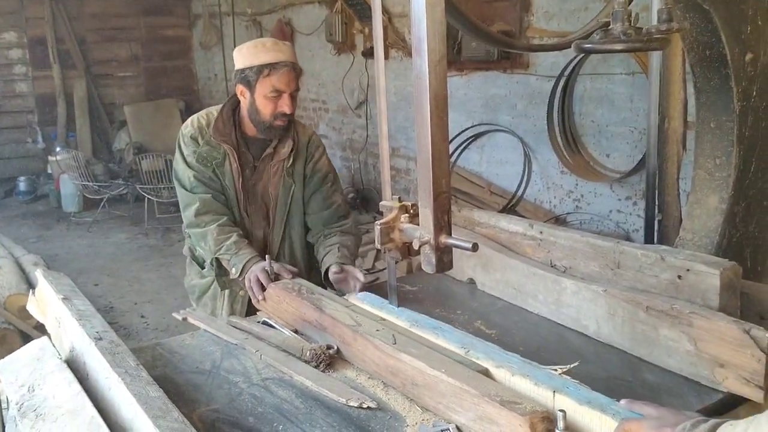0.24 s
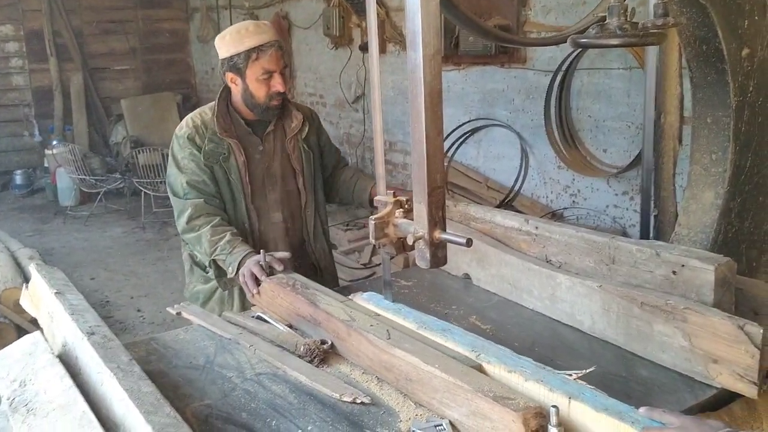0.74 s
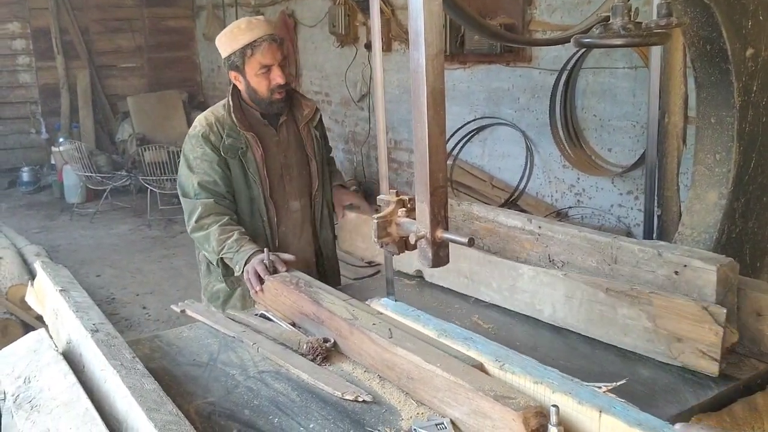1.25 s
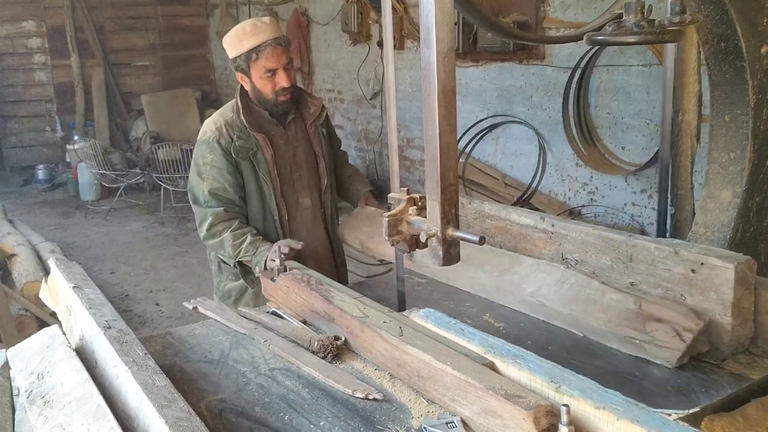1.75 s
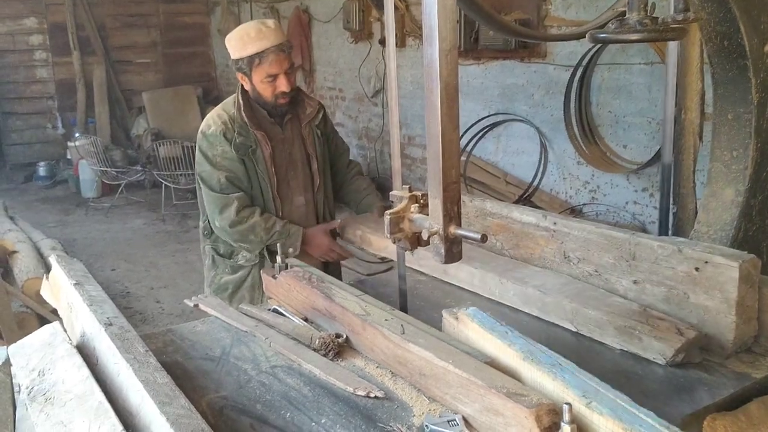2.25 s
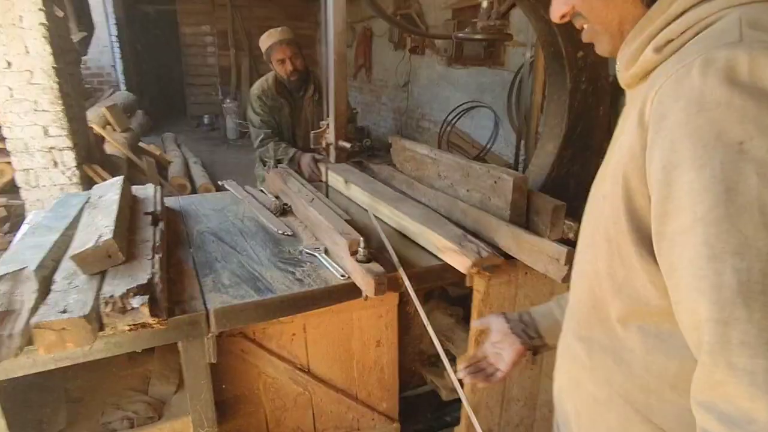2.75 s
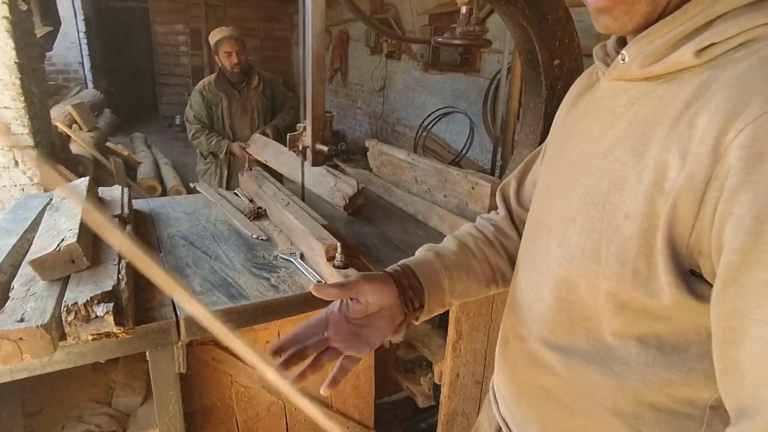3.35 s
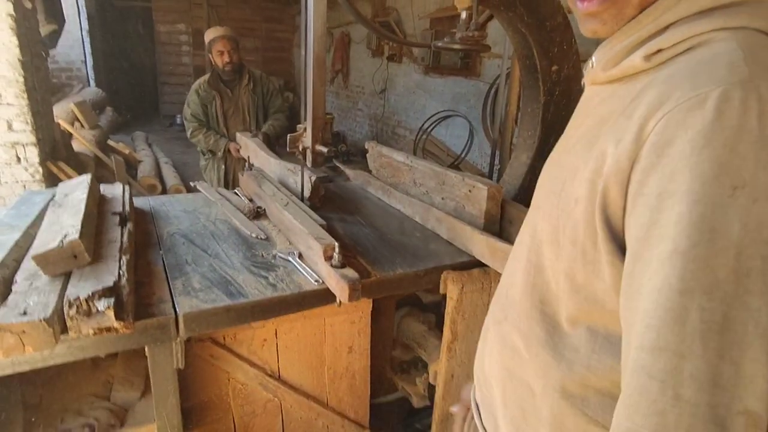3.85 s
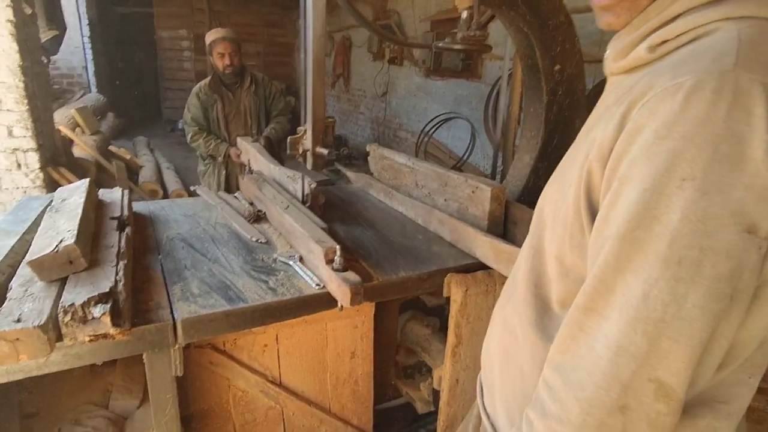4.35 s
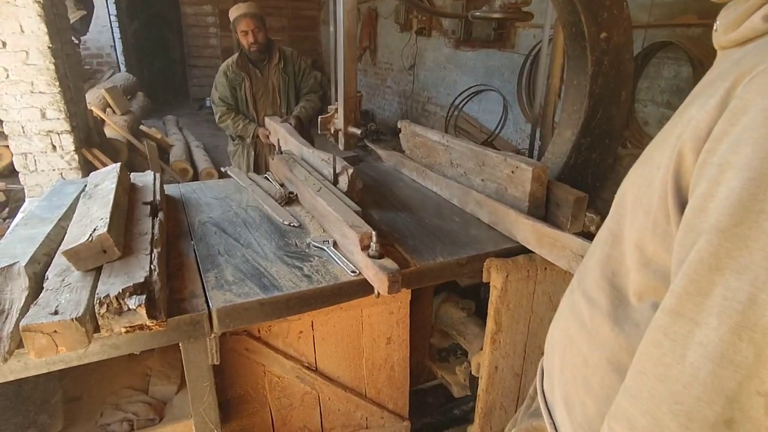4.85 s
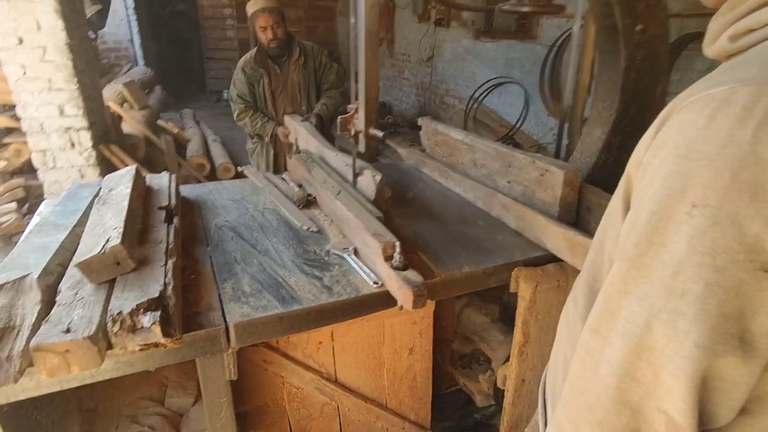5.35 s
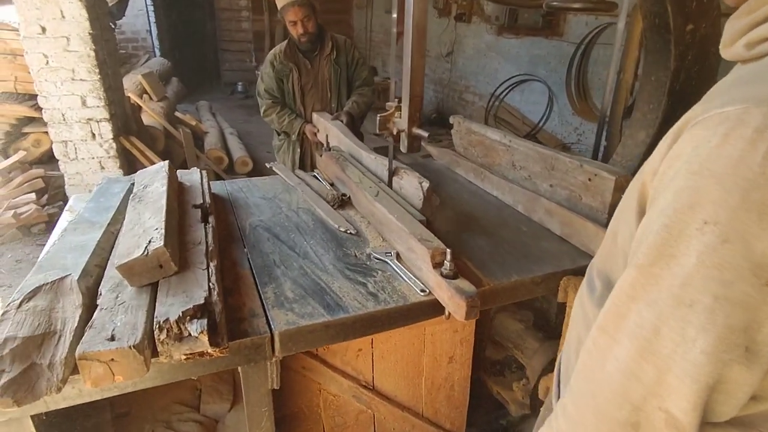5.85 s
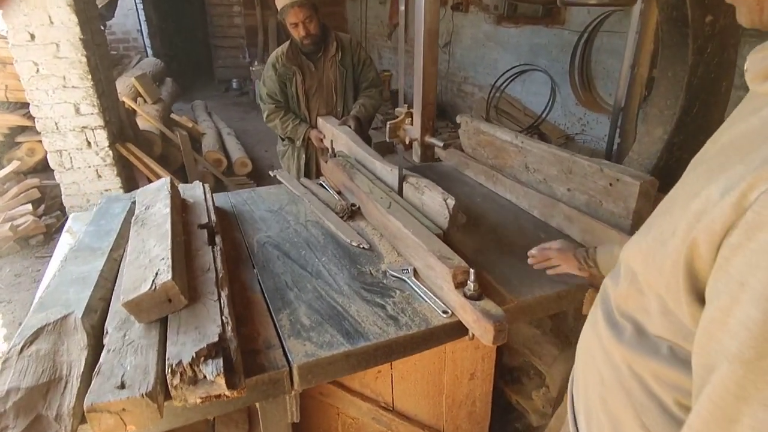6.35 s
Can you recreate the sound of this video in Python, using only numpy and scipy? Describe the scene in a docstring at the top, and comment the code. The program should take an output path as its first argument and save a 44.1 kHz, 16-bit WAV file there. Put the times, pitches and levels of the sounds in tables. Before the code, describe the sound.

A large band saw rasps and whines through a timber beam in a workshop, with planks knocking, a brief silent break, then a more distant, ringing view.

```python
"""A big band saw rips a beam in a workshop, heard from two places with a short pause between.
Noise shaped into rasp, ring and hiss makes the teeth, the steel band and the dust; sine waves make the whine.
Filtered noise makes the rumble of the wheels and drive, and now and then a faint singing of the band.
Short bursts of noise make planks knock on the saw table; a deep thump makes the gain control
turn the treble down for a moment."""
import sys
import numpy as np
from scipy import signal
from scipy.fft import rfft, irfft
from scipy.io import wavfile
from scipy.ndimage import uniform_filter1d, minimum_filter1d

SR = 44100
rng = np.random.default_rng(int(sys.argv[2]) if len(sys.argv) > 2 else 0)


def pcm_store(signal):
    """Save signal as 16-bit PCM."""
    levels = np.round(np.clip(np.atleast_2d(signal), -1, 1) * 32767)
    wavfile.write(sys.argv[1], SR, levels.astype(np.int16).T)


N = 291060

# "near" is the place by the blade, heard first; "far" is further off, heard after the pause
# side_db means left minus right; the levels in a spectrum only count against each other

# spectrum of the wheels and drive: pitch_hz, level_db (per Hz)
DRIVE_SPECTRUM = [(25, -3), (70, -11.5), (120, -3), (160, 1.5), (260, -1), (340, -1.5), (450, -5.5),
                  (600, -3), (1000, -8), (1500, -11), (2200, -9.5), (3300, -14.5), (6000, -35.5)]
# spectrum of the teeth tearing wood, near and far: pitch_hz, level_db (per Hz)
RASP_NEAR_SPECTRUM = [(300, -34.5), (900, -14), (1600, -13.5), (2000, -3), (2850, 1), (3400, -1.5),
                      (4300, -13), (5200, -14), (6200, -27), (9000, -51)]
RASP_FAR_SPECTRUM = [(300, -37), (900, -3), (1550, -2), (1800, 2), (2100, 4), (2500, 1.5), (3400, 4),
                     (4500, -1), (6500, -4.5), (9000, -8)]
# spectrum of the ringing steel band: pitch_hz, level_db (per Hz)
RING_SPECTRUM = [(3000, -46.5), (3650, -19), (3800, -9), (3920, -0.5), (4250, -4), (4900, -7), (5400, -13),
                 (5900, -21), (6500, -38), (8000, -68)]
# spectrum of the sawdust spray: pitch_hz, left_level_db (per Hz), right_level_db (per Hz)
HISS_SPECTRUM = [(5500, -44, -37), (6700, -23, -15.5), (7430, -11, -10), (10480, -5, -4.5),
                 (10260, 1.5, 5.5), (11170, 1, -4), (12600, -1.5, -4), (14300, 1.5, -7.5)]
# how the drive spreads in stereo: pitch_hz, near_side_db, far_side_db, left_right_likeness (0 to 1)
DRIVE_SIDES = [(40, 15, 5.8, 0.4), (150, 12.5, 7.4, 0.92), (300, 9, 4.2, 0.7), (600, 8, 1.8, 0.2),
               (1110, 1, 2.2, 0), (2200, -7, 3, 0)]
# resonances of the frame, table and shed: pitch_hz, width_hz, near_lift_db, far_lift_db
FRAME_RESONANCES = [(157, 22, 2, 6.5), (185, 30, -1, -0.5), (232, 18, 7.5, 10.5), (274, 18, 6, 6.5),
                    (392, 26, 1.5, 0), (501, 42, 0, 8.5), (573, 32, 5, 5.5), (682, 38, 2.5, 4),
                    (760, 6.9, 11.5, 12.5), (933, 17, 4, 3), (1115, 207, 12, 12.5), (1168, 52, -5, -12),
                    (1353, 59, 13, 10.5), (1581, 50, 11.5, -20), (1722, 86, 12.5, 11.5)]
# whine of teeth set left and right in turn: multiple of the pair rate, near_level_db, far_level_db, side_db
TOOTH_LINES = [(4, -52, -58.5, -22), (5, -58, -57, -7), (8, -39.5, -62, -8), (10, -35, -64, -25),
               (12, -68, -67, -28), (16, -39, -60, -3.5)]
# moments when the band sings in its guides: start_s, end_s, pitch_hz, level_db
SINGING_MOMENTS = [(3.25, 3.53, 1120, -40.5), (3.2, 3.7, 1357, -43), (3.4, 3.65, 1745, -46),
                   (4.7, 5.25, 1748, -44), (5.5, 6.0, 1745, -46)]
# planks on the table: start_s, level_db, lowest_hz, highest_hz, chatter_s, side_db
PLANK_KNOCKS = [(1.337, -21.5, 130, 970, 0.029, 10), (1.375, -27.5, 190, 450, 0.04, 10),
                (1.915, -26, 200, 1050, 0.021, 14), (1.925, -28, 120, 900, 0.033, 9),
                (3.642, -26.5, 150, 650, 0.048, 3), (4.067, -20, 457, 960, 0.034, 3.5),
                (4.102, -19, 400, 1800, 0.027, 15), (4.111, -20, 900, 1700, 0.012, -7),
                (4.563, -29.5, 340, 700, 0.046, 5), (5.145, -23, 30, 109, 0.017, 27),
                (5.157, -19.5, 60, 615, 0.021, 14), (5.167, -21.5, 250, 1380, 0.0089, 16),
                (5.182, -20.5, 80, 553, 0.004, 16), (5.198, -21.5, 100, 404, 0.017, 21),
                (5.217, -22.5, 70, 935, 0.024, 19), (5.241, -25, 70, 735, 0.016, 17),
                (5.287, -21.5, 50, 470, 0.013, 16.5)]
# resonances of a plank: pitch_hz, width_hz, lift_db
PLANK_RESONANCES = [(197, 55, 10.5), (291, 110, 12.5), (485, 45, 4.5), (618, 74, 8.5), (765, 93, 8.5),
                    (1068, 160, 8.5), (1640, 110, 6)]
# work of the saw, which bites hardest just before the band comes free and rings:
# time_s, rasp_level_db, ring_level_db, hiss_level_db
SAW_WORK = [(0, -27.5, -32, -29), (1.2, -28, -31, -31), (1.35, -23.5, -32, -31.5),
            (1.73, -24, -29.5, -32.5), (1.76, -29, -33.5, -37.5), (1.92, -28.5, -24, -33),
            (2.66, -29.5, -24, -31), (3.0, -37, -21.5, -27), (3.2, -37, -23.5, -34),
            (3.6, -36, -24.5, -29.5), (4.0, -34, -24, -29.5), (4.3, -35, -24, -34),
            (4.9, -36.5, -25, -28.5), (5.6, -35.5, -24.5, -29.5), (6.15, -39, -25, -31.5),
            (6.6, -36, -24.5, -31.5)]
# moments when the pressure on the band eases: middle_s, length_s, depth_db
PRESSURE_DIPS = [(0.177, 0.16, -4.5), (0.504, 0.13, -2.0), (0.621, 0.19, -4.5), (1.434, 0.19, -3),
                 (2.276, 0.14, -2.5), (2.5, 0.068, -1.5), (3.123, 0.15, -2.5), (3.356, 0.1, -3),
                 (3.758, 0.06, -3), (4.19, 0.12, -3.5), (5.366, 0.24, -2.5), (6.247, 0.075, -2.5)]
# the band presses harder twice in each turn of its wheels, one row near and one far:
# turns_per_s, crest_s, once_a_turn_db, twice_a_turn_db
WHEEL_WOBBLE = [(4.585, -.04, .45, .55), (4.405, .02, .45, .25)]
# how the treble reaches the microphones: time_s, hiss_side_db, ring_tilt_db (per octave)
TREBLE_PATH = [(0, -3, -31), (1.1, -3.5, -22.5), (1.9, -8.5, -22), (2.7, -10.5, -24), (2.8, -19, 4),
               (3.9, -14.5, 4), (5.0, -11.5, 1.5), (6.6, -2, 16)]
# gain control, one row for the left microphone and one for the right: depth_db, recovery_db_per_s
DUCK_SIDES = [(19, 90), (10.5, 900)]
# the running machine: time_s, rumble_level_db, whine_level_db (added to the level of each tooth line)
MACHINE_RUN = [(0, -33.5, -4.5), (1.5, -37, -0.5), (2.0, -36, -12), (2.65, -34.5, -3.5), (2.95, -39, 5),
               (3.4, -36, 5.5), (4.5, -32.5, 11.5), (5.2, -36, -8), (5.6, -35.5, 10.5), (6.6, -32.5, -11)]

PAUSE_START_S, TICK_S, PAUSE_END_S = 2.674, 2.769, 2.811
FADE_IN_DB, FADE_IN_S = -11.5, 0.18  # after the pause the sound swells to its full level
TOOTH_PAIR_HZ = 271.8
FLUTTER_DB, FLUTTER_PER_S = 0.96, 17.6  # uneven grain of the wood
DUCK_THRESHOLD_DB, DUCK_KNEE_DB = -36.5, 3
DUCK_LAG_S, DUCK_HOLD_S = .024, .03
EDGE_HZ = 14290  # the highest pitch let through
T, HZ = np.arange(N) / SR, np.fft.rfftfreq(N, 1 / SR)
NEAR = T < PAUSE_END_S


def amp(db):
    """Turns decibels into a gain."""
    return 10 ** (np.asarray(db) / 20)


def evened(x):
    """Scales to an rms (average strength) of one."""
    return x / np.sqrt(np.mean(x ** 2, axis=-1, keepdims=True) + 1e-20)


def curves(rows):
    """Draws each column of a timed table as a line through time, sample by sample."""
    times, *columns = np.transpose(rows)
    return [np.interp(T, times, column) for column in columns]


def spectrum(rows, axis=1):
    """Draws one column of a table over log frequency."""
    table = np.transpose(rows)
    return np.interp(np.log(HZ + 1), np.log(table[0] + 1), table[axis])


def bump(f, centre_hz, width_hz):
    """The shape of one resonance, one at its top."""
    return 1 / (1 + (2 * (f - centre_hz) / width_hz) ** 2)


def wander(rate, size=N):
    """Smooth random movement of rms one, changing up to about rate times in every SR points."""
    f = np.fft.rfftfreq(size, 1 / SR)
    smooth = rfft(rng.standard_normal(size)) / (1 + (f / rate) ** 4)
    return evened(irfft(smooth, size))


def ripple(depth_db, spacing_hz):
    """Close random peaks and dips from many modes and reflections, different at each microphone."""
    rate = SR * HZ[1] / spacing_hz / 2
    return depth_db * np.array([wander(rate, len(HZ)) for _ in range(2)])


def coloured(x, db, band=(0, SR)):
    """Filters two channels so that their average has rms one inside the band (in Hz)."""
    z = rfft(x) * amp(db)
    inside = (HZ >= band[0]) & (HZ <= band[1])
    return irfft(z, N) / np.std(irfft(z.mean(0) * inside, N))


def panned(side_db):
    """Left and right gains that keep the total power the same."""
    gains = amp(np.array([[.5], [-.5]]) * side_db)
    return gains / np.sqrt(np.mean(gains ** 2, axis=0))


def smoothed(x, size):
    """A running average (one-pole) over about size samples."""
    return signal.lfilter([1 / size], [1, 1 / size - 1], x)


def chips(per_s, share):
    """Fibres tearing: a dense rush of noise, with separate snaps of uneven size as a share of its power."""
    snaps = rng.standard_normal((2, N)) * (rng.random(N) < per_s / SR)
    rush = rng.standard_normal((2, N))
    return np.sqrt(1 - share) * rush + np.sqrt(share) * evened(snaps)


def drive(level_db):
    """Wheels, belt and bearings shake the frame; the microphones share more of the low end than the top."""
    left, other = rng.standard_normal((2, N))
    same = np.clip(spectrum(DRIVE_SIDES, axis=3), 0, 1)
    right = irfft(same * rfft(left) + np.sqrt(1 - same ** 2) * rfft(other), N)
    shake = np.array([left, right])
    places = []
    for place in range(2):
        frame_db = sum(lifts[place] * bump(HZ, hz, width) for hz, width, *lifts in FRAME_RESONANCES)
        side_db = 20 * np.log10(panned(spectrum(DRIVE_SIDES, axis=place + 1)))
        places.append(coloured(shake, spectrum(DRIVE_SPECTRUM) + frame_db + side_db))
    return amp(level_db + 0.78 * wander(rate=5.4)) * np.where(NEAR, *places)


def knocks(room_db=-17, room_t60_s=.4, strike=.3):
    """Each blow chatters briefly and rings the plank; the shed adds a short tail."""
    size = SR // 2
    t, f = np.arange(size) / SR, np.fft.rfftfreq(size, 1 / SR)
    plank = amp(sum(db * bump(f, hz, width) for hz, width, db in PLANK_RESONANCES))
    out = np.zeros((2, N + size))
    for start_s, level_db, low_hz, high_hz, chatter_s, side_db in PLANK_KNOCKS:
        contact = rng.standard_normal(size) * np.exp(-t / chatter_s)
        contact[0] += strike * np.sqrt(chatter_s * SR / 2)  # the first firm contact
        tail = rng.standard_normal((2, size)) * amp(room_db - 60 * t / room_t60_s)
        # the contact time limits the top, the size of the piece the bottom
        top = signal.butter(3, high_hz, fs=SR, output="sos")
        bottom = signal.butter(2, low_hz, "high", fs=SR, output="sos")
        limited = signal.sosfilt(np.vstack([top, bottom]), contact + tail)
        blow = irfft(rfft(limited) * plank, size) * (1 - t / t[-1])
        blow = blow / np.std(blow.mean(0)[:SR // 50])  # level set by the first 20 ms
        start = round(start_s * SR)
        out[:, start:start + size] += amp(level_db) * panned(side_db) * blow
    return out[:, :N]


def singing(width_hz=24):
    """Now and then one mode of the band sings faintly and unevenly where it rubs in the guides."""
    sway = wander(width_hz / 2) + 1j * wander(width_hz / 2)
    out = np.zeros(N)
    for start_s, end_s, pitch_hz, level_db in SINGING_MOMENTS:
        swell = np.sin(np.pi * np.clip((T - start_s) / (end_s - start_s), 0, 1))
        out += amp(level_db) * swell * (sway * np.exp(2j * np.pi * pitch_hz * T)).real
    return out * panned(side_db=-7)


def whine(level_db):
    """Harmonics of the passing teeth; the speed wavers and each line swells and fades by chance."""
    waver = 1 + .002 * wander(rate=4) + .006 * wander(rate=60)
    pairs_passed = np.cumsum(TOOTH_PAIR_HZ * waver) / SR
    out = np.zeros((2, N))
    for multiple, near_db, far_db, side_db in TOOTH_LINES:
        line_db = level_db + np.where(NEAR, near_db, far_db) + 3.0 * wander(rate=12)
        # the right channel runs a quarter cycle ahead of the left
        phase = rng.uniform(0, 2 * np.pi) + np.array([[0], [np.pi / 2]])
        tone = 2 * np.sin(2 * np.pi * round(multiple) * pairs_passed + phase)
        out += amp(line_db) * tone * panned(side_db)
    return out


def dust_hiss(level_db, side_db):
    """Fine spray of sawdust, lifted above 10 kHz by the band's second bend across the width."""
    sides = np.array([spectrum(HISS_SPECTRUM, axis=1), spectrum(HISS_SPECTRUM, axis=2)])
    shape_db = sides + ripple(depth_db=.6, spacing_hz=40)
    spray = coloured(chips(per_s=1200, share=0.1), shape_db, band=(7500, 14000))
    return amp(level_db) * spray * panned(side_db)


def band_ring(level_db, tilt_db):
    """The steel band rings in a crowd of modes that starts abruptly at its first bend across the width."""
    band = (3700, 6000)
    strikes = chips(per_s=900, share=0.031)
    shape_db = spectrum(RING_SPECTRUM) + ripple(depth_db=1.5, spacing_hz=16)
    octaves = np.log2(np.clip(HZ, 3000, 5500) / 4000)
    shape_db[0] -= 22 * octaves  # the left microphone is shaded from the higher modes
    # blend between the dullest and the brightest tilt
    dull = coloured(strikes, shape_db + tilt_db.min() * octaves, band)
    bright = coloured(strikes, shape_db + tilt_db.max() * octaves, band)
    opening = (tilt_db - tilt_db.min()) / np.ptp(tilt_db)
    sides = np.where(NEAR, panned(side_db=-20), panned(side_db=-23.0))
    return amp(level_db) * (dull + opening * (bright - dull)) * sides


def bite():
    """How hard the teeth bite, in dB: wobble of the wheels, grain of the wood, moments of less pressure."""
    wobbles = []
    for turns_per_s, crest_s, once_db, twice_db in WHEEL_WOBBLE:
        angle = 2 * np.pi * turns_per_s * (T - crest_s)
        wobbles.append(once_db * np.cos(angle) + twice_db * np.cos(2 * angle))
    eased = np.zeros(N)
    for middle_s, length_s, depth_db in PRESSURE_DIPS:
        eased += depth_db * np.cos(np.pi * np.clip((T - middle_s) / length_s, -.5, .5)) ** 2
    return np.where(NEAR, *wobbles) + FLUTTER_DB * wander(FLUTTER_PER_S) + eased


def rasp(level_db, easy_db=-27, span_db=1.0, screech_hz=2980, screech_width_hz=700, screech_db=4):
    """Teeth tearing the wood; near the blade, a hard push gathers the rasp into a screech."""
    band = (2000, 3500)
    tear = chips(per_s=500, share=0.055)
    fine_db = ripple(depth_db=.8, spacing_hz=22)
    near_db = spectrum(RASP_NEAR_SPECTRUM) + fine_db
    easy = coloured(tear, near_db, band)
    hard = coloured(tear, near_db + screech_db * bump(HZ, screech_hz, screech_width_hz), band)
    push = np.clip((level_db - easy_db) / span_db, 0, 1)
    near = (easy + push * (hard - easy)) * panned(side_db=-20.5)
    far = coloured(tear, spectrum(RASP_FAR_SPECTRUM) + fine_db, band) * panned(side_db=-47)
    return amp(level_db) * np.where(NEAR, near, far)


def scene():
    """The saw, whose rasp, ring and hiss share one bite, with its whine, singing, drive and the planks."""
    rasp_db, ring_db, hiss_db = curves(SAW_WORK) + bite()
    side_db, tilt_db = curves(TREBLE_PATH)
    drive_db, whine_db = curves(MACHINE_RUN)
    background = drive(drive_db) + knocks()
    tones = singing() + whine(whine_db)
    saw = dust_hiss(hiss_db, side_db) + band_ring(ring_db, tilt_db) + rasp(rasp_db)
    return background + tones + saw


def gain_control(dry):
    """A deep thump ducks the treble; after a hold the right side snaps back and the left recovers slowly."""
    thump_hz, split_hz = 90, 1200
    thump, low = (irfft(rfft(dry) / (1 + (HZ / hz) ** 6), N) for hz in (thump_hz, split_hz))
    power_db = 10 * np.log10(smoothed((thump ** 2).mean(0), size=400) + 1e-12)
    late_db = np.interp(T - DUCK_LAG_S, T, power_db)
    pressed = np.clip((late_db - DUCK_THRESHOLD_DB) / DUCK_KNEE_DB, 0, 1)
    half = round(DUCK_HOLD_S * SR / 2)
    held = -minimum_filter1d(-pressed, 2 * half + 1, origin=half)  # keeps the highest recent value
    depth_db, recovery = np.transpose(DUCK_SIDES)[:, :, None]
    # the duck may fall no faster than the recovery rate
    duck_db = np.maximum.accumulate(depth_db * held + recovery * T, axis=1) - recovery * T
    return low + (dry - low) * amp(-smoothed(duck_db, size=400))


def record(dry):
    """Gain control, a pause with one small tick, a fade-in at the second place, then a cut of the top."""
    pause = (T > PAUSE_START_S) & (T < PAUSE_END_S)
    fade_db = FADE_IN_DB * np.clip(1 - (T - PAUSE_END_S) / FADE_IN_S, 0, 1) * (T >= PAUSE_END_S)
    tick = amp(-19) * ((T > TICK_S) & (T < TICK_S + .004))  # a little sound slips through for 4 ms
    gate = np.where(pause, amp(-58), amp(fade_db)) + tick
    heard = gain_control(dry) * uniform_filter1d(gate, size=60)
    top_cut = signal.firwin(1501, EDGE_HZ, window=("kaiser", 8), fs=SR)
    return signal.oaconvolve(heard, top_cut[None], "same")


dry = scene()
out = record(dry)
pcm_store(out)
```